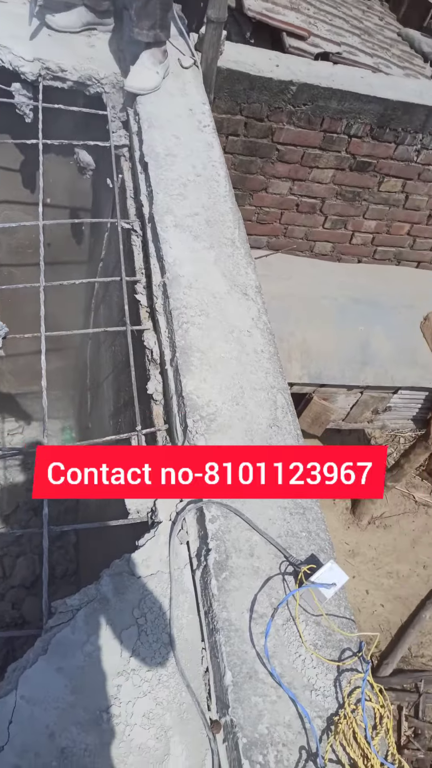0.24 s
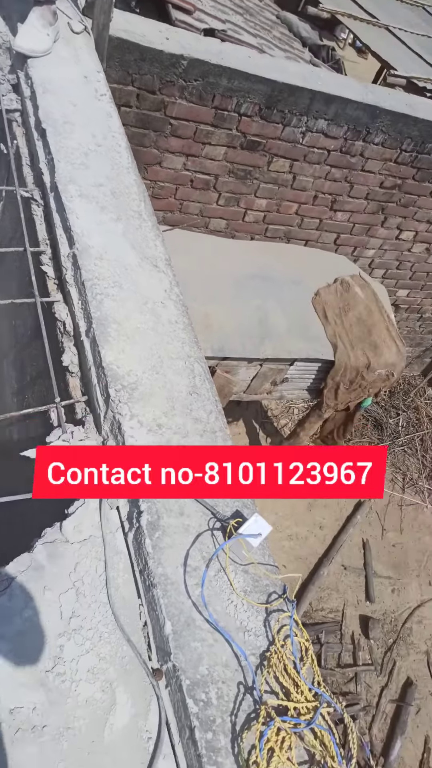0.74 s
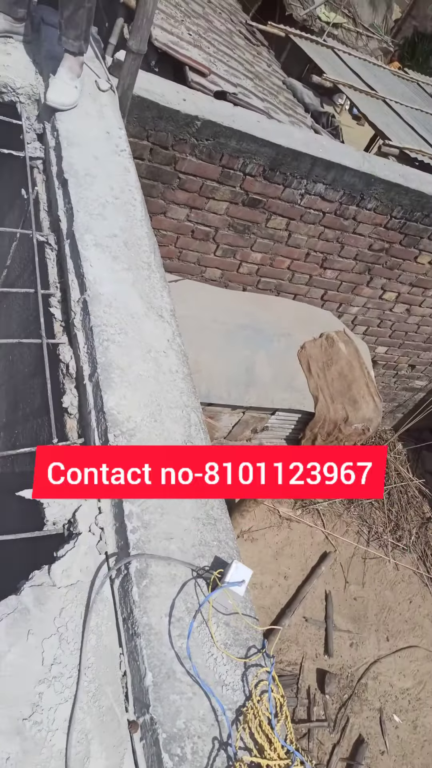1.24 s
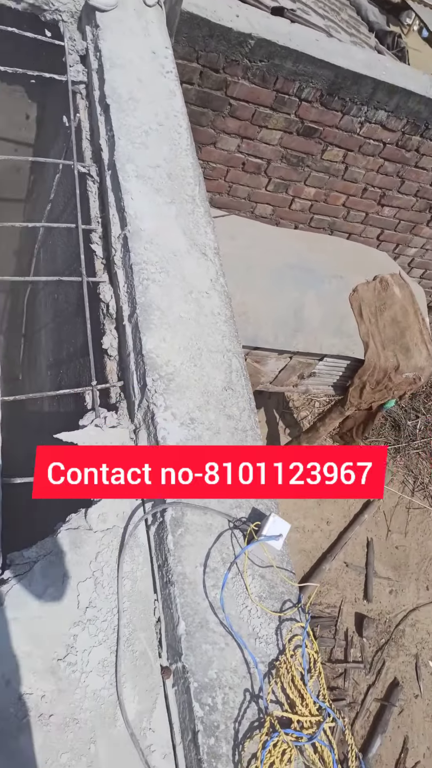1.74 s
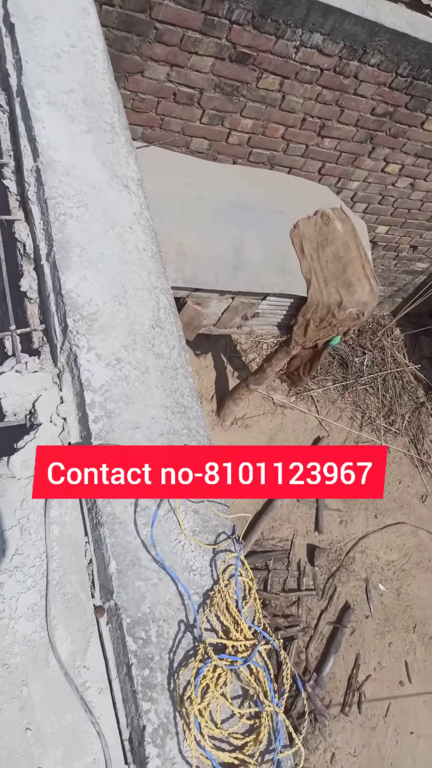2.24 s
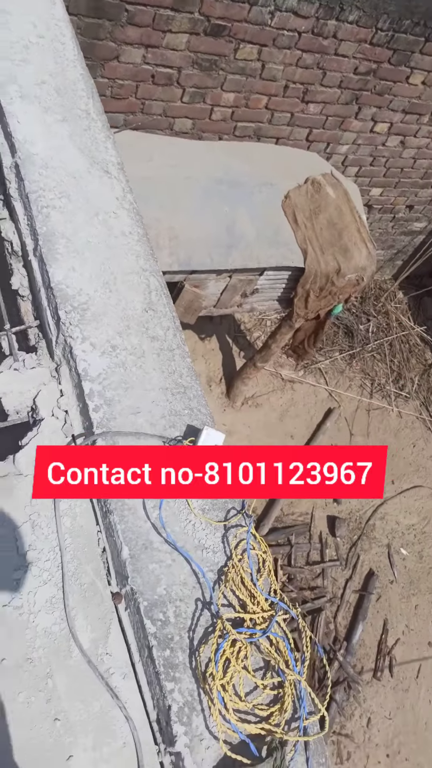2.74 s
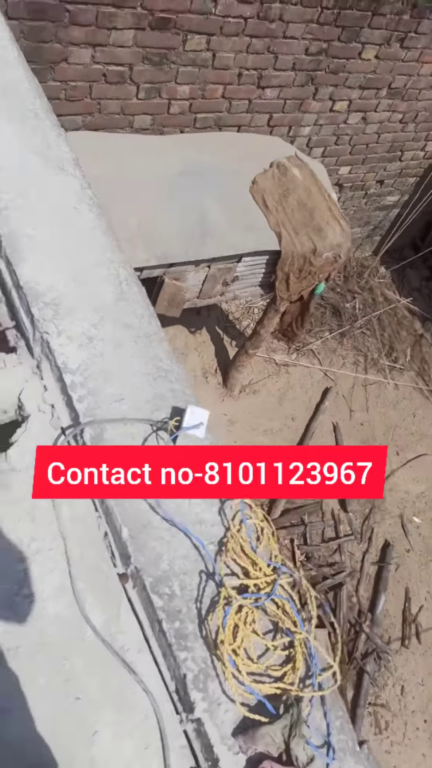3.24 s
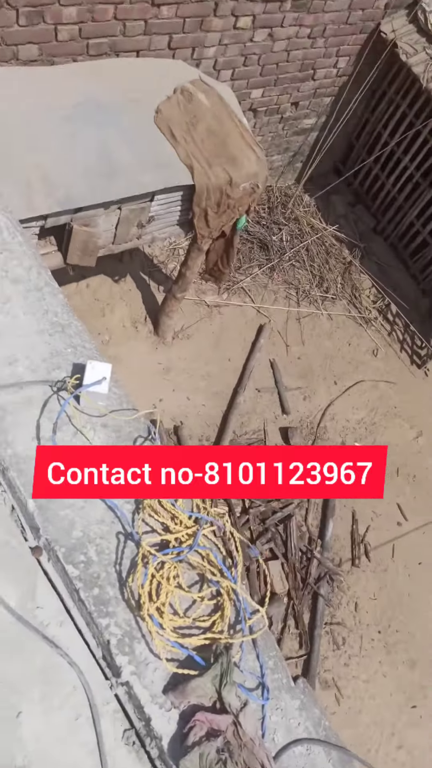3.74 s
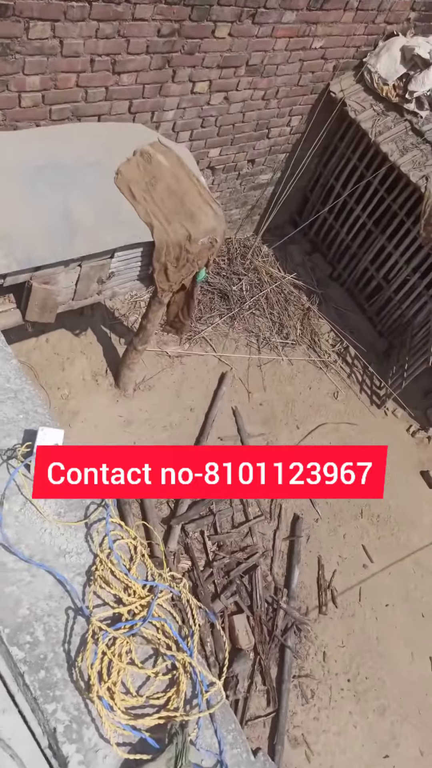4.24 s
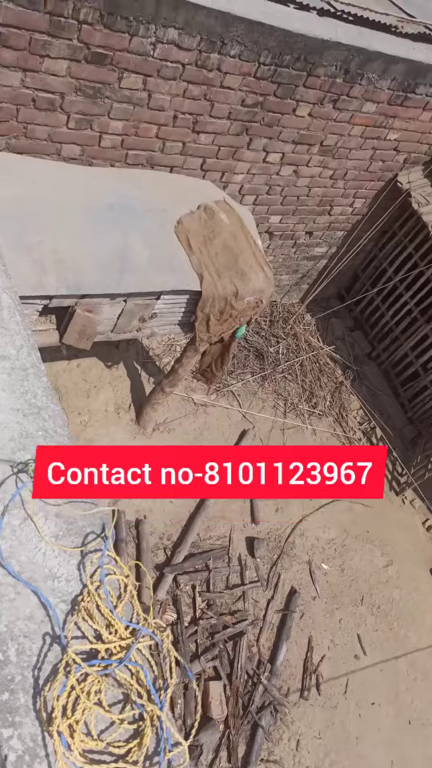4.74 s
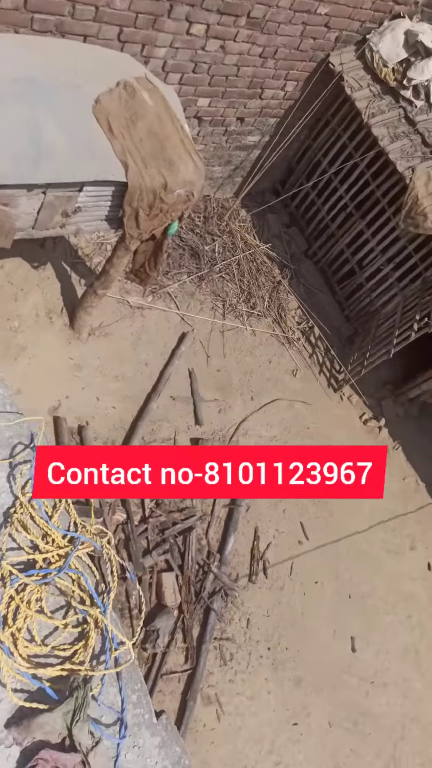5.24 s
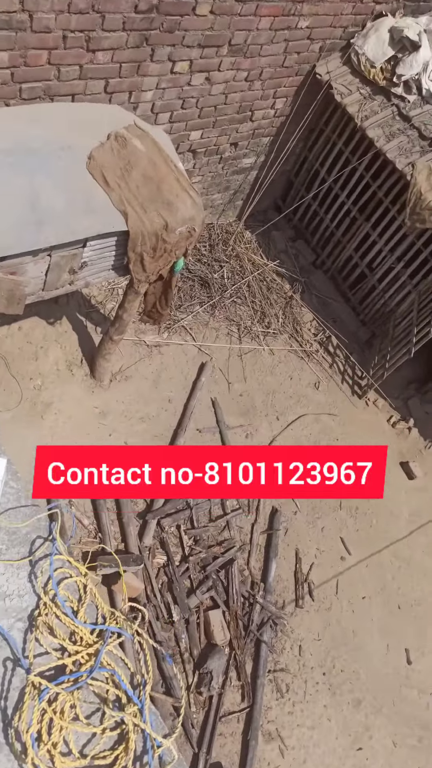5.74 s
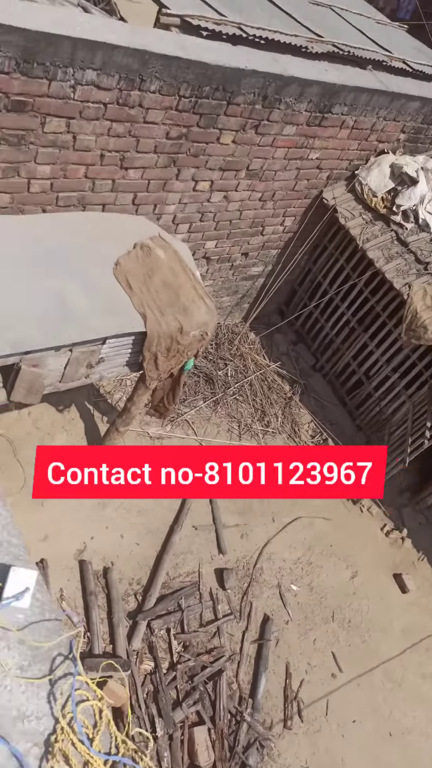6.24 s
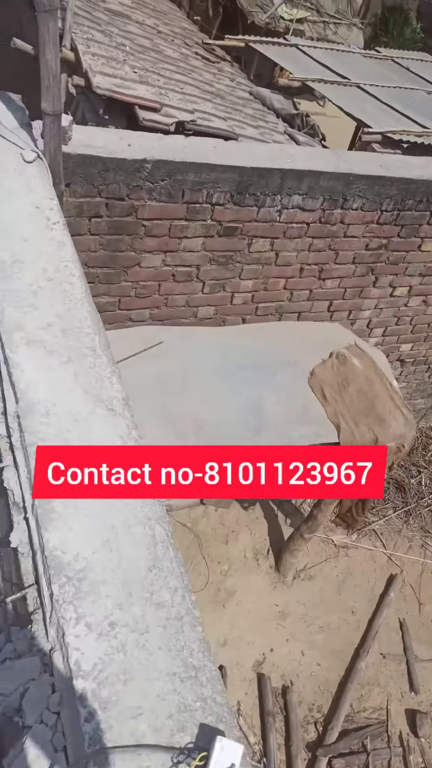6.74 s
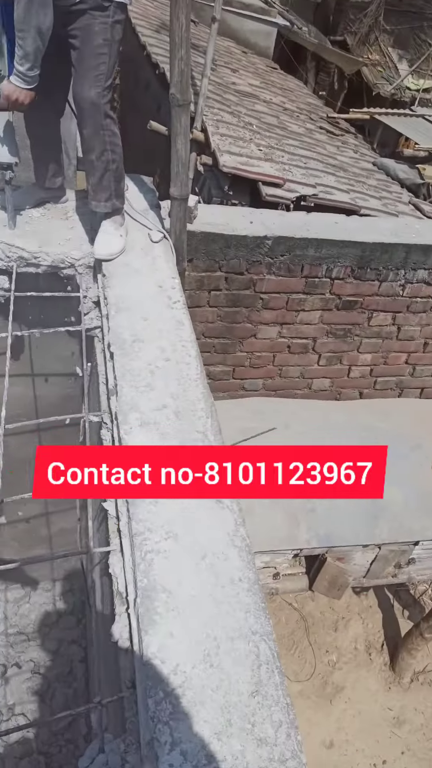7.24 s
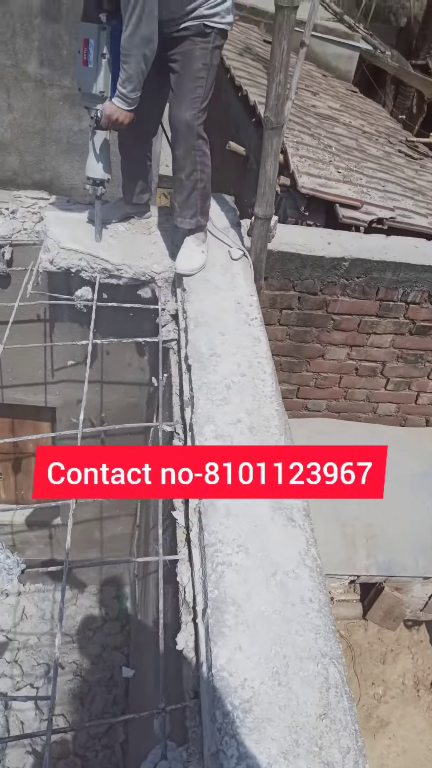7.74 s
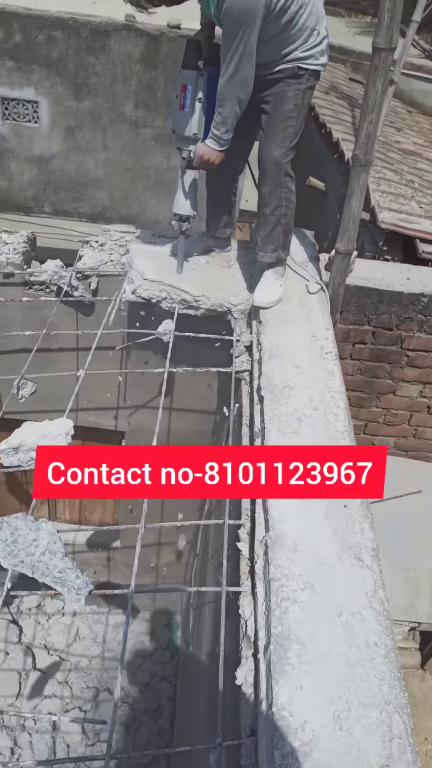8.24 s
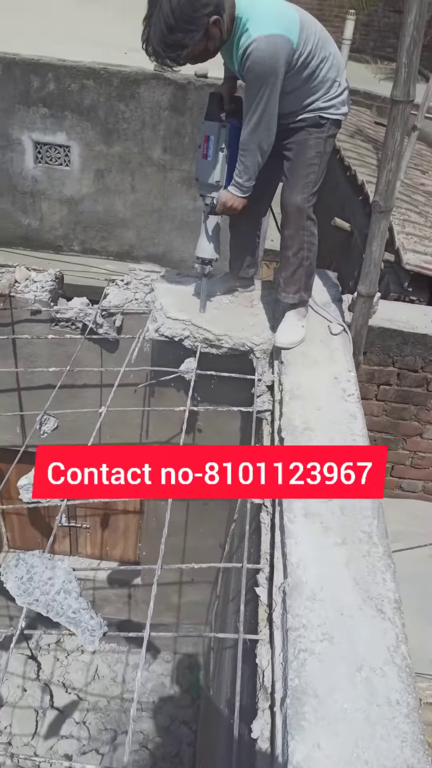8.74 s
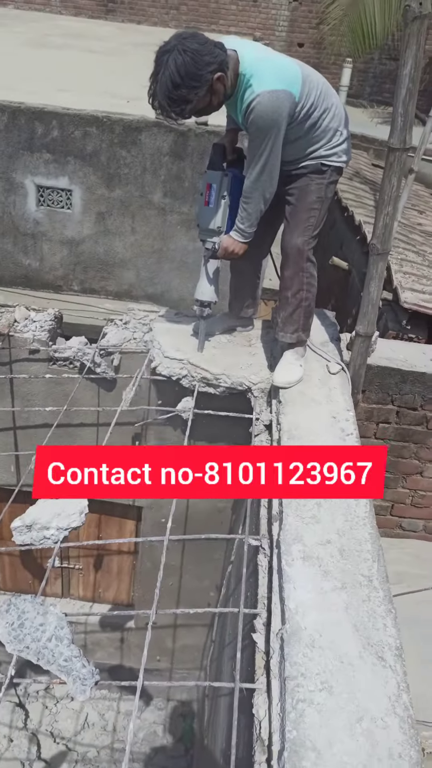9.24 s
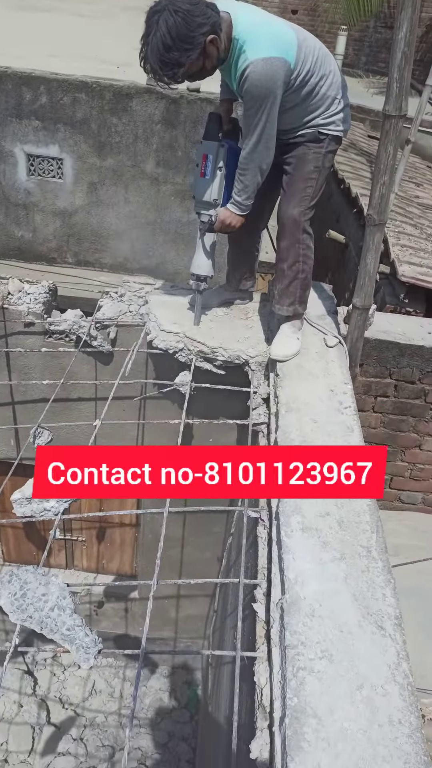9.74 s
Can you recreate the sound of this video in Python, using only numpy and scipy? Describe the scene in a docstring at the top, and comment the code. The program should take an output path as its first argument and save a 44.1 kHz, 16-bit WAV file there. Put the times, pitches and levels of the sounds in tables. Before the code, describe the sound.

Slowing hammer blows, airy piston hisses and short falling whistles open the scene, with concrete pieces dropping and gritty spray. A brief lull follows, then the breaker spins up to roughly twenty-two blows a second and stays there, bright, metallic and dense over motor rush and low roof rumble. A second, duller breaker overlaps later, coasting between bursts. Handheld phone very close, dry open air.

```python
"""On a concrete roof slab two demolition hammers break the concrete close to a stereo phone.
The near one runs down, starts again and hammers on: each blow is noise bursts for the crack and pushes through
resonances for the knock, thud and rebounds. A duller one joins in three bursts and coasts between them.
The steel chisels ring as decaying sines, slow strokes hiss and whistle, rubble drops, and filtered noise
makes the motors and the roof's rumble. The phone turns away and back, and the peaks clip softly."""
import sys
import numpy as np
from scipy import signal
from scipy.fft import rfft, irfft, next_fast_len
from scipy.io import wavfile
from scipy.ndimage import uniform_filter1d, map_coordinates

SR = 44100
rng = np.random.default_rng(int(sys.argv[2]) if len(sys.argv) > 2 else 0)


def waveform_to_disk(signal):
    """Save audio, clipped to [-1, 1], as 16-bit WAV at the path in sys.argv[1]."""
    frames = np.transpose(np.atleast_2d(signal))
    scaled = np.clip(frames, -1, 1) * 32767
    samples = np.round(scaled).astype(np.int16)
    wavfile.write(sys.argv[1], SR, samples)


N = 440559

# Colour of the rushing air and of the grit. Each row: frequency in Hz, relative level in dB per Hz.
RUSH_SPECTRUM = [(1530, 1.5), (2600, -2), (3860, 6), (4580, 3.5), (4960, -7), (5820, -5), (6370, 2),
                 (7150, 2.5), (8220, -6.5), (8600, 2), (11200, 1), (18900, -120)]
# Fizz at the top of the motors and the cracks. Each row: frequency in Hz, relative level in dB per Hz.
FIZZ_SPECTRUM = [(6820, -3.5), (11600, -3.5), (12100, -5.5), (12600, -2), (15600, -5)]
# Hiss of air at the piston. Each row: frequency in Hz, relative level in dB per Hz.
PISTON_SPECTRUM = [(1200, -37), (1800, -24), (2250, -7), (2900, -15), (4500, -16), (6000, -37)]
# The phone turns away and back. Each row: time in seconds, lag of the left port in ms.
PHONE_TURN = [(0, .39), (2.3, .39), (2.7, -.29), (6.7, -.29), (7.0, .45), (9.99, .45)]


def amp(db):
    """Decibels to an amplitude factor."""
    return 10 ** (np.asarray(db) / 20)


def unit(x):
    """Scale x to rms 1."""
    return x / np.sqrt(np.mean(x ** 2) + 1e-20)


def along(points, hz):
    """Read (Hz, value) points on a log frequency axis."""
    f, v = np.transpose(points)
    return np.interp(np.log(hz + 1), np.log(f + 1), v)


def at(rows, s):
    """The columns of a table of curves, read at times s."""
    t, *cols = np.transpose(rows)
    return [np.interp(s, t, c) for c in cols]


def wobble(rate):
    """A smooth random curve with rate knots a second."""
    knots = rng.standard_normal(int(N * rate / SR) + 4)
    return map_coordinates(knots, [np.arange(N) * rate / SR])


def filtered(x, response):
    """x through a complex response of frequency, padded so that tails do not wrap round."""
    m = next_fast_len(N + SR // 2)
    return irfft(rfft(x, m) * response(np.fft.rfftfreq(m, 1 / SR)), m)[..., :N]


def noise(spectrum, patchy_db=0):
    """Stereo noise of rms 1, more alike at some pitches, with patches of random gain in time and pitch."""
    # Each row: frequency in Hz, left-right likeness from 0 to 1.
    likeness = [(30, 0.16), (100, 0.79), (300, 1), (640, 0.26), (1400, 0.48), (6000, 0.092), (15000, 0.086)]
    z = signal.stft(rng.standard_normal((2, N)), nperseg=256)[2]
    patches = uniform_filter1d(rng.standard_normal(z.shape[1:]), 4, 0)
    patches = uniform_filter1d(patches, 8, 1)
    pair = signal.istft(z * amp(patchy_db * unit(patches)), nperseg=256)[1][:, :N]

    def colour(hz):
        angle = np.arccos(np.clip(along(likeness, hz), -1, 1)) / 2
        return amp(along(spectrum, hz)) * [np.cos(angle), np.sin(angle)]

    mid, side = filtered(pair, colour)
    return unit(np.array([mid + side, mid - side]))


def pulses(times, sizes):
    """A train of single-sample pushes."""
    samples = np.clip(np.round(times * SR).astype(int), 0, N - 1)
    return np.bincount(samples.ravel(), sizes.ravel(), N)


def bursts(times, db, rise, t60):
    """Loudness of noise that flares at each time and dies; powers add."""
    t = np.arange(SR // 5) / SR
    power = (1 - np.exp(-t / rise)) ** 2 * amp(-120 * t / t60)
    return np.sqrt(np.abs(signal.fftconvolve(pulses(times, amp(2 * db)), power)[:N]))


def body(push, modes):
    """Pushes through resonances of alternating sign; a push of 1 starts each mode at its own dB."""
    def ring(f):
        total = 0
        for k, (centre, width, db) in enumerate(modes):
            drive = (-1) ** k * amp(db) * 1j * f * SR / (2 * np.pi)
            total = total + drive / (centre * centre - f * f + 1j * f * width)
        return total

    return filtered(push, ring)


def motors():
    """Cooling air and gears rush unevenly as drifting coloured noise, over the low rumble of the roof."""
    # Each row: time in seconds, level of rush, gears and fizz in dB.
    motor_levels = [(0.0, -21.5, -22, -25), (0.64, -24, -25.5, -42), (0.94, -27.5, -27, -59),
                    (1.17, -30, -37.5, -49), (1.28, -23.5, -21.5, -26), (1.5, -13.5, -21.5, -23),
                    (1.85, -19.5, -28, -23), (2.2, -12.5, -19, -15), (2.4, -23, -26, -15),
                    (3.1, -23.5, -20.5, -20.5), (3.75, -43, -25.5, -15), (4.45, -20.5, -22.5, -16.5),
                    (4.95, -16, -20, -22), (5.9, -28.5, -19, -19.5), (7.1, -17.5, -18.5, -25),
                    (8.0, -10, -20, -17), (8.75, -19, -21.5, -22), (9.06, -13, -17, -19),
                    (9.35, -19, -23, -25.5), (9.8, -13, -21, -15), (9.99, -12, -19, -17)]
    # Each row: time in seconds, rumble of the roof in dB.
    rumble_level = [(0, -27), (.6, -30), (.95, -30), (1.15, -38), (1.4, -25), (2.5, -25), (3, -30),
                    (6.9, -30), (7.4, -23), (8.3, -22), (8.6, -25), (9.5, -25), (9.99, -22)]
    # Each row: frequency in Hz, relative level in dB per Hz.
    gear_spectrum = [(500, 1), (1000, -1.5), (1500, 1), (2200, -1), (2800, -5), (4000, -14)]
    # Each row: frequency in Hz, relative level in dB per Hz.
    rumble_spectrum = [(15, -32), (30, -8), (60, -50), (100, -6.5), (200, -9.5), (400, -10), (800, -13),
                       (1300, -35), (2500, -56)]
    t = np.arange(N) / SR
    rush_db, gears_db, fizz_db = at(motor_levels, t)
    rumble_db, = at(rumble_level, t)
    rattle_db = 0.56 * wobble(70) + 0.083 * wobble(14)
    air = amp(rush_db + rattle_db) * noise(RUSH_SPECTRUM, patchy_db=3.5)
    air += amp(fizz_db + rattle_db) * noise(FIZZ_SPECTRUM, patchy_db=4.5)
    gears = amp(gears_db + rattle_db + 0.13 * wobble(30)) * noise(gear_spectrum, patchy_db=3.5)
    return air + gears + amp(rumble_db + 1.5 * wobble(40)) * noise(rumble_spectrum)


def rubble():
    """Lumps and one stray hammer blow: a sinking thump, a stony clack of damped modes and a spray of grit."""
    # Lumps land, and one stray hammer blow falls at 2.761 s. Each row: start in seconds, thump level in dB,
    # settled thump pitch in Hz, thump t60 in seconds, relative clack level in dB, relative grit level in dB.
    impacts = [(0.336, -3, 223, 0.063, -28, -28), (0.436, -15, 248, 0.14, -47, -17),
               (0.465, -9, 134, 0.11, -39, -19.5), (0.497, -6, 120, 0.11, -39, -19),
               (0.624, -11, 196, 0.051, -25, -30), (0.668, -12, 288, .06, -42, -17.5),
               (0.687, -13, 297, .06, -40, -19), (0.783, -27, 417, 0.044, -10.5, -11.5),
               (0.805, -24, 395, .05, -22, -13.5), (0.835, -35, 300, .05, -30, -31),
               (0.891, -18, 210, .1, -30, -46), (0.902, -13.5, 145, 0.16, -23.5, -45),
               (1.064, -12, 395, .035, -18, -45), (1.076, -26, 380, .04, -22, -42),
               (1.091, -37, 380, .04, -26, -48), (1.257, -17, 162, .1, -38, -22),
               (2.761, -27, 270, .1, -31, -16), (6.135, -9, 266, 0.074, -35, -12.5)]
    # Modes of a lump of concrete. Each row: frequency in Hz, width in Hz, relative level in dB.
    lump_modes = [(424, 80, 2), (916, 160, 7), (1146, 140, 8), (2360, 330, 2)]
    left_lead_s = .0004  # offsets the left port's lag: most lumps sound from the middle, between the two ports
    s, thump_db, thump_hz, thump_t60, clack_db, grit_db = np.transpose(impacts)
    thumps, t = np.zeros(N + SR), np.arange(SR // 5) / SR
    for start, db, hz, t60 in zip(s, thump_db, thump_hz, thump_t60):
        cycles = hz * (t + 0.003 * (1 - np.exp(-t / 0.0042)))  # the pitch starts high and settles
        fade = amp(db - 60 * t / t60) * (1 - np.exp(-t / 0.002))
        thumps[round(start * SR):][:len(t)] += fade * np.sin(2 * np.pi * cycles)
    scrape = bursts(s, clack_db - 24, rise=.0005, t60=.04) * rng.standard_normal(N)
    clack = body(pulses(s, amp(clack_db + 2.5)) + scrape, lump_modes)
    sides = np.array([[1], [-1]])
    lumps = filtered(thumps[:N] + clack, lambda hz: np.exp(1j * np.pi * hz * left_lead_s * sides))
    return lumps + bursts(s, grit_db + 7.5, rise=0.00045, t60=0.075) * noise(RUSH_SPECTRUM)


def idling():
    """Slow strokes of the near hammer push air past the piston in hisses, the early ones with a falling whistle."""
    # The hammer runs down and restarts. Each row: start in seconds, hiss level in dB, t60 in seconds.
    hisses = [(.05, -16, 0.066), (0.138, -14.5, .12), (.236, -14, 0.087), (.352, -12.5, 0.1),
              (.63, -19.5, 0.46), (1.163, -24.5, 1.7), (1.258, -20, 0.18), (1.345, -17, .2)]
    # Each row: start in seconds, whistle level in dB.
    whistles = [(.135, -17), (.24, -19), (.354, -16)]
    first_hz, fall_per_s, length_s = 2360, 6.8, 0.028  # fall: share of the first pitch lost a second
    loudness = 0
    for s, db, t60 in hisses:
        loudness = loudness + bursts(np.array([s]), np.array([db]), rise=0.0028, t60=t60)
    hiss = loudness * noise(PISTON_SPECTRUM, patchy_db=2.0)
    t = np.arange(round(length_s * SR)) / SR
    tone = np.hanning(len(t)) * np.sin(2 * np.pi * first_hz * (t - fall_per_s * t ** 2 / 2))
    s, db = np.transpose(whistles)
    return hiss + amp(1.5 * wobble(300)) * signal.fftconvolve(pulses(s, amp(db)), tone)[:N]


def blows(runs):
    """A blow falls each time the running speed adds up to another whole stroke."""
    times = []
    for run in runs:
        s = np.arange(run[0][0], run[-1][0], 1 / SR)
        strokes = np.cumsum(at(run, s)[0]) / SR
        times += list(np.interp(np.arange(int(strokes[-1]) + 1), strokes, s))
    return np.array(times)[:, None]


def chisel(s, db):
    """Every blow rings the steel modes; their strengths drift as the chisel shifts in its hole."""
    # Each row: mode frequency in Hz, relative level in dB, t60 in seconds.
    steel_modes = [(3300, -3, .035), (3750, -5, .03), (4450, -6, .04), (6160, -1, .07), (6500, -3, .04),
                   (7630, -1, .13), (8020, -3, .16), (8460, -4, .1), (12400, -8, .06), (13700, -12, .1)]
    # Change of each steel mode in dB while the phone is turned away.
    away_db = [6.5, -4, -6, 2, 2, -1.5, 1, -9.5, 6, 0]
    out, t = np.zeros((2, N + SR)), np.arange(SR // 8) / SR
    hz, level_db, t60 = np.transpose(steel_modes)[:, :, None]
    draw = rng.standard_normal((len(s), 4, len(steel_modes), 1))
    drift = unit(uniform_filter1d(draw[:, 1], size=7, axis=0))
    strength_db = 2.2 * draw[:, 0] + 2 * drift
    turned_away = at(PHONE_TURN, s)[0] < 0
    strength_db += turned_away[:, None, None] * np.array(away_db)[:, None]
    for start, blow_db, size_db, pitch, turn in zip(s, db, strength_db, draw[:, 2], draw[:, 3]):
        fade = amp(blow_db + level_db + size_db - 60 * t / t60) * (1 - np.exp(-t / 0.0014))
        phase = 2 * np.pi * hz * (1 + .004 * pitch) * t
        left = (fade * np.sin(phase)).sum(0)
        right = (fade * np.sin(phase + 1.34 * turn)).sum(0)
        out[:, round(start * SR):][:, :len(t)] += [left, right]
    return out[:, :N]


def hammer(speed, coasting, seat, edge, odd, scatter_db, contacts,
           crack_db, knock_db, thud_db, boom_db, ring_db, puff_db, loose_db):
    """Each contact cracks the concrete, jolts the slab, clanks the housing, knocks the loose edge, thuds and booms."""
    # Each row: frequency in Hz, relative level in dB per Hz.
    crack_spectrum = [(530, -66), (900, 6), (1170, 1.5), (1420, 0), (2150, 2.5), (3310, 8.5), (4480, 8),
                      (4970, 1), (5840, 1), (6360, 14.5), (7190, 4.5), (7820, -8), (8600, 6.5), (11200, -1),
                      (18900, -120)]
    # Each row: frequency in Hz, relative level in dB per Hz.
    snap_spectrum = [(1200, -35), (2600, -8), (3400, 8), (4600, -2), (5200, 2), (6400, -9), (8500, 6),
                     (15000, -16)]
    # Mode tables from here on. Each row: frequency in Hz, width in Hz, relative level in dB.
    # The loose edge under the chisel.
    edge_modes = [(634, 63, 3), (886, 124, 12), (1210, 900, -18)]
    # Low bending modes of the slab.
    slab_modes = [(174.7, 45, -1), (276.3, 35.7, -1.5), (324, 96, 0)]
    # The whole roof booms.
    roof_modes = [(112, 8.4, 1)]
    # Upper bending modes of the slab, strongest under the near hammer from about 7 to 8 s.
    hollow_modes = [(424, 58, 0.5), (543, 56, -3.5)]
    # The first wave through the slab.
    jolt_modes = [(436, 590, 0.5)]
    # The hammer's housing.
    housing_modes = [(1554, 190, -2.5), (2150, 140, -6), (3540, 180, -4), (4440, 240, -6)]
    full_gap_s = .044  # rebounds come sooner under this gap between blows
    slow_gap_s, slow_loss_db_per_s = 0.057, 150  # late rebounds fade over this gap
    # Bending waves: lag at the given pitch, longer below; head start through the concrete.
    spread_s, spread_hz, lead_s = 0.00254, 500, 0.004005

    s = np.sort(np.append(blows(speed), [when for when, _ in coasting]))[:, None]
    usual_db, *coupling = at(seat, s)
    jolt_db, clank_db, snap_db = at(edge, s)
    bite_db, force_db = scatter_db * rng.standard_normal(s.shape), np.zeros(s.shape)
    for when, db in odd + coasting:
        nearest = np.abs(s - when).argmin()
        s[nearest], bite_db[nearest] = when, db
        force_db[nearest] = db * ((when, db) in coasting)  # only coasting changes the whole blow
    blow_db = usual_db + bite_db

    gap = np.diff(s, axis=0, prepend=s[:1] - full_gap_s)
    gap = np.minimum(gap, np.roll(gap, -1))  # the shorter of the gaps before and after
    delay, *contact_levels = np.transpose(contacts)
    slow_db = -slow_loss_db_per_s * np.clip(gap - slow_gap_s, 0, None) * (delay > .01)
    on_crack, on_knock, on_thud, on_boom, on_hollow, on_jolt, on_clank = [slow_db + db for db in contact_levels]
    draw = rng.standard_normal((len(s), 4, len(contacts)))
    times = s + delay * np.minimum(gap / full_gap_s, 1) * (1 + .004 * draw[:, 0])

    flare = bursts(times, blow_db + on_crack + 1.9 * draw[:, 1], rise=0.002, t60=0.029)
    crack_noise = noise(crack_spectrum, patchy_db=3.0) + amp(-1.5) * noise(FIZZ_SPECTRUM)
    out = amp(crack_db) * flare * crack_noise
    out += bursts(s, snap_db + bite_db, rise=0.00085, t60=0.012) * noise(snap_spectrum)
    # The piston hisses as it drives forward, ahead of the blow.
    out += bursts(s - .026, blow_db + puff_db, rise=0.029, t60=0.17) * noise(PISTON_SPECTRUM)

    bodies = [(edge_modes, on_knock + knock_db, 1), (slab_modes, on_thud + thud_db, 1),
              (roof_modes, on_boom + boom_db, 1), (hollow_modes, on_hollow + thud_db, -1)]
    for level_db, (modes, contact_db, swing) in zip(coupling, bodies):
        db = level_db + force_db + contact_db + 0.8 * draw[:, 2]
        chatter = rng.standard_normal(N) + .6 * rng.standard_normal((2, N))  # loose pieces
        chatter *= bursts(times, db + loose_db, rise=.001, t60=.04)
        out += swing * body(pulses(times, amp(db)) + chatter, modes)

    db = clank_db + force_db + on_clank + 2.5 * draw[:, 3]
    rattle = bursts(times, db - 9.5, rise=0.00029, t60=0.014) * rng.standard_normal((2, N))
    out += body(pulses(times, amp(db)) + rattle, housing_modes)

    def spread(f):
        return np.exp(-2j * np.pi * (2 * spread_s * np.sqrt(spread_hz * f) - lead_s * f))

    jolt_push = pulses(times, amp(jolt_db + force_db + on_jolt + draw[:, 2]))
    out += filtered(body(jolt_push, jolt_modes), spread)
    return out + chisel(s[:, 0], blow_db[:, 0] + ring_db)


def far_hammer():
    """The second, duller hammer: three driven bursts, with ever slower coasting blows between them."""
    # One curve for each run, starting on a blow. Each row: time in seconds, blows a second.
    speed = [
        [(7.3039, 22.78), (7.88, 25.21), (7.99, 24.33), (8.14, 25.83), (8.34, 22.57)],
        [(8.887, 21.5), (9.06, 22.86), (9.13, 22.97)],
        [(9.5534, 21.29), (9.63, 22.93), (9.95, 24.78)],
    ]
    # Blows as it runs down. Each row: time in seconds, level in dB over the usual.
    coasting = [(8.39, 0), (8.445, 4), (8.505, -4), (8.569, 1.5), (8.643, 0), (8.725, 3), (8.819, 0.5),
                (9.166, 3.5), (9.227, 1.5), (9.286, 2), (9.35, 0.5), (9.42, -2.5), (9.493, -2)]
    # Coupling to the concrete. Each row: time in seconds, relative crack, knock, thud, boom, hollow in dB.
    seat = [(7.3, -10.5, -38, -50, -44, -34), (7.55, -3, -36, -44, -37, -24),
            (7.9, -21, -35, -33, -43, -39), (8.2, -5, -31.5, -22.5, -41, -33),
            (8.33, -14, -34, -25, -36, -27), (8.5, -19, -37, -26.5, -38, -34),
            (8.7, -14, -38, -29, -38, -30), (8.84, -19, -35, -28, -35, -23),
            (9.07, -6, -34, -23.5, -24, -23), (9.16, -15, -42, -25.5, -35, -27),
            (9.3, -14, -39, -26, -32, -26), (9.45, -18, -33, -30, -35, -21),
            (9.55, -16, -37, -24.5, -35, -22), (9.94, -19, -48, -20, -22, -26)]
    # Sharpness of the blows. Each row: time in seconds, relative jolt, clank, snap in dB.
    edge = [(7.3, -18, -16, -25), (7.8, -17, -18, -20), (8.2, -6, -20, -20), (8.45, -10, -24, -23),
            (8.75, -12, -18, -37), (8.9, -6, -19, -25), (9.1, -12, -17, -20), (9.25, -8, -23, -25),
            (9.45, -9, -17, -25), (9.6, -15, -18, -20), (9.94, -12, -17, -20)]
    # Blows that glance off, bite or come early. Each row: time in seconds, crack in dB over the usual.
    odd = [(7.39, 3), (7.476, -4), (7.686, -2), (7.846, 6), (8.049, -19), (8.131, 0), (8.888, 1), (9.6, -9),
           (9.688, 8), (9.937, -9)]
    # Blow and rebounds. Each row: delay in seconds at full gap, then relative levels in dB of
    # crack, knock, thud, boom, hollow, jolt, clank.
    contacts = [(0, -13, 2, -3, 17.5, -34, -9, 6), (.003, 3.5, 7, 10, -22, 4, -10, -2),
                (.009, -14, 4.5, -21, -24, 1, 8, -11), (0.0149, -5, 5, 2, -7, -10, -1, -10),
                (.031, -11, -3, -34, -18, -25, -20, -18)]
    return hammer(speed, coasting, seat, edge, odd, 2, contacts, crack_db=1.5, knock_db=9.0,
                  thud_db=8.0, boom_db=-10.5, ring_db=-44, puff_db=-44, loose_db=-31)


def near_hammer():
    """The hammer close to the phone: it runs down, starts again and hammers on, its chisel ringing clearly."""
    # One curve for each run, starting on a blow. Each row: time in seconds, blows a second.
    speed = [
        [(0.009, 15.73), (0.23, 9.05), (0.77, 3.14)],
        [(1.225, 12.5), (1.37, 18.5), (1.45, 18.5), (1.61, 24)],
        [(1.672, 15.6), (1.8, 15), (1.885, 11.6)],
        [(1.936, 20.0), (2.27, 21.75), (2.55, 19.89), (2.64, 16.59), (2.87, 22.34), (3.43, 22.25),
         (4.16, 22.87), (4.31, 22.26), (4.58, 22.81), (4.67, 20.89), (4.91, 22.93), (5.6, 22.45), (6.78, 22.94),
         (7.2, 22.88), (8.28, 23.62), (9.54, 28.02), (9.66, 25.18), (9.97, 25.7)],
    ]
    # Coupling to the concrete. Each row: time in seconds, relative crack, knock, thud, boom, hollow in dB.
    seat = [(0.01, -12, -22, -22.5, -53, -26), (0.26, -13.5, -36, -24, -43, -19.5),
            (0.76, -19, -28, -26, -52, -18), (1.23, -13, -34, -32, -38, -25), (1.4, -7, -26, -35, -43, -25),
            (1.57, -10, -20.5, -28, -45, -22.5), (2.1, -9.5, -25, -27.5, -39, -26),
            (2.5, -10, -33, -26.5, -38.5, -22), (3.2, -10, -30, -24, -38, -23),
            (4.1, -9.5, -39, -24.5, -39, -24), (5.1, -10, -25.5, -26, -39.5, -23.5),
            (6.2, -10, -19, -26, -40, -21.5), (6.85, -12, -23, -28, -40, -19),
            (7.15, -9, -12, -27, -41, -15.5), (7.6, -15.5, -22, -21, -50, -15),
            (8.5, -12.5, -23, -21.5, -45, -21), (9.0, -18, -24, -27, -44, -30.5),
            (9.96, -14, -39, -26, -51, -26)]
    # Sharpness of the blows. Each row: time in seconds, relative jolt, clank, snap in dB.
    edge = [(0, -4, -16.5, -18), (.4, -4, -30, -24), (.76, -6, -32, -30), (1.25, -9, -24, -16),
            (2.0, -27, -40, -27), (2.8, -26, -37, -27), (3.6, -4, -29, -11), (4.599, -8, -26, -8),
            (5.5, -5, -24, -14), (6.5, -5, -20, -18), (7.2, -19, -29, -9), (7.8, -15, -20, -14),
            (8.3, -9, -22, -3), (8.8, -15, -21, -2), (9.1, -13, -32, -12), (9.5, -14, -21, -16),
            (9.96, -5.5, -20, -3)]
    # Blows that glance off, bite or come early. Each row: time in seconds, crack in dB over the usual.
    odd = [(0.762, 2), (1.226, -1.5), (1.937, -5), (2.225, -7), (2.262, 2), (2.406, 3), (2.497, -2.5),
           (2.92, 2.5), (3.053, -6), (3.458, 2), (3.501, -2), (3.549, 1.5), (3.768, -7), (3.812, -3),
           (4.035, -4), (4.478, -2), (4.655, 1.5), (4.751, -6), (5.324, -6), (5.413, 0), (5.457, -1),
           (6.909, 2.5), (6.995, -6), (7.39, -6), (7.519, -10), (7.65, -13), (7.692, 3), (8.248, -7),
           (8.291, -4), (8.621, 1), (8.7, -1), (9.238, -6), (9.385, -4), (9.457, -17), (9.643, 6),
           (9.917, -14)]
    # Blow and rebounds. Each row: delay in seconds at full gap, then relative levels in dB of
    # crack, knock, thud, boom, hollow, jolt, clank.
    contacts = [(0, 4.5, 0.5, 12, 9, 4.5, 9.5, -11.5), (.0024, 0.5, -3, -9.5, -12, -21, -8, 8),
                (.0065, -12, -42, 9, -1, -8.5, -8, -15), (0.0149, -1, -2.5, 7.5, 4, 8, 2, -18),
                (.029, -14.5, -19, 6.5, -38, -9.5, -34, -15)]
    return hammer(speed, [], seat, edge, odd, 1.4, contacts, crack_db=2.0, knock_db=1.5,
                  thud_db=1.5, boom_db=8, ring_db=-5, puff_db=-10.0, loose_db=-38)


def scene():
    """Everything on the roof, from the background to the near hammer."""
    return motors() + rubble() + idling() + far_hammer() + near_hammer()


def record(dry):
    """The phone's two ports differ in delay and colour, peaks clip softly, and a treble band is nearly silent."""
    # Each row: frequency in Hz, left minus right in dB.
    port_tilt = [(60, -2), (150, 1), (380, -2), (950, -1.5), (2380, -3.5), (5980, -2), (8300, 2),
                 (12000, -0.5), (15000, -1.5)]
    # A treble band that is nearly silent. Each row: frequency in Hz, gain in dB.
    silent_band = [(8550, 0), (8700, -12), (10000, -26), (11000, -40), (11450, -45), (11600, 0)]
    shared_hz, top_hz = 323, 15795  # below the first both ports hear the bass together; the second is the top
    half_lag = at(PHONE_TURN, np.arange(N) / SR)[0] * SR / 2000  # samples
    ports = np.array([map_coordinates(x, [np.arange(N) - side * half_lag], order=5)
                      for x, side in zip(dry, (1, -1))])
    ports = ports + filtered(dry - ports, lambda hz: 1 / (1 + (hz / shared_hz) ** 4))

    def port_colour(hz):
        tilt = amp(along(port_tilt, hz) / 2 * np.array([[1], [-1]]))
        return tilt / (1 + (68 / (hz + 1)) ** 3.1)  # small ports lose the deep bass

    wet = filtered(ports, port_colour)
    clipped = wet / (1 + np.abs(wet / .92) ** 5) ** (1 / 5)
    return filtered(clipped, lambda hz: amp(along(silent_band, hz)) * (hz < top_hz))


dry = scene()
out = record(dry)
waveform_to_disk(out)
```